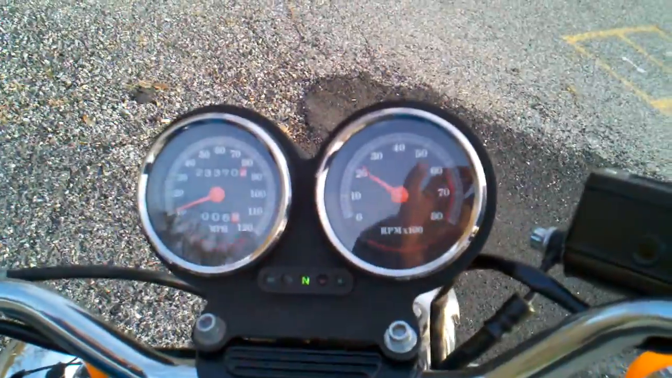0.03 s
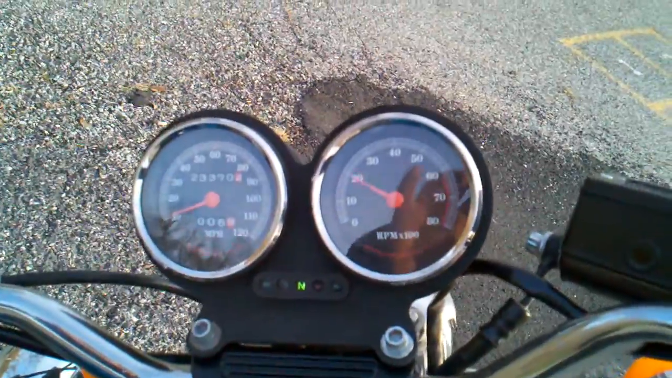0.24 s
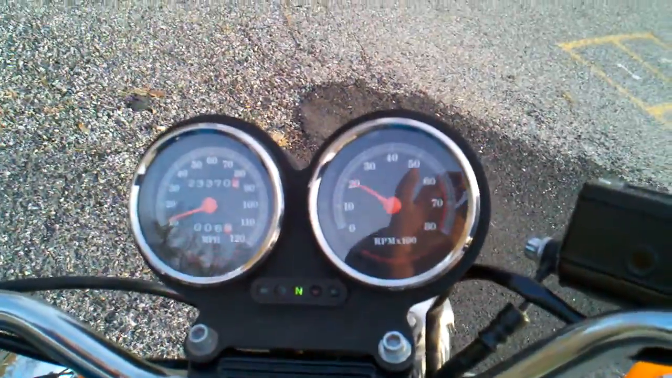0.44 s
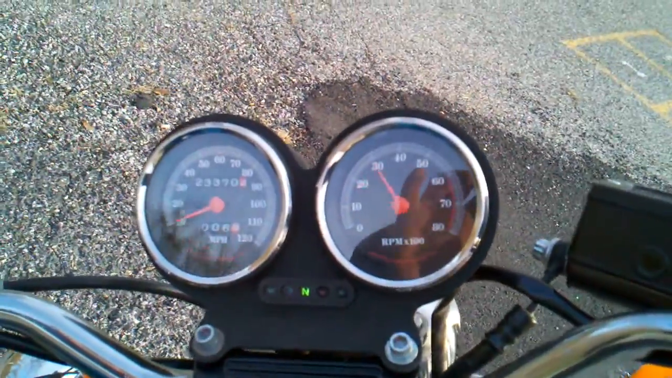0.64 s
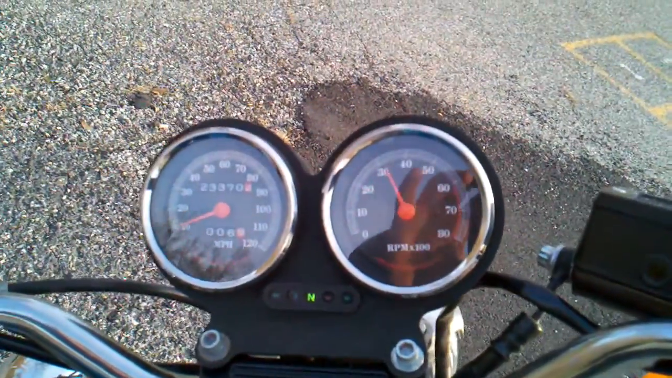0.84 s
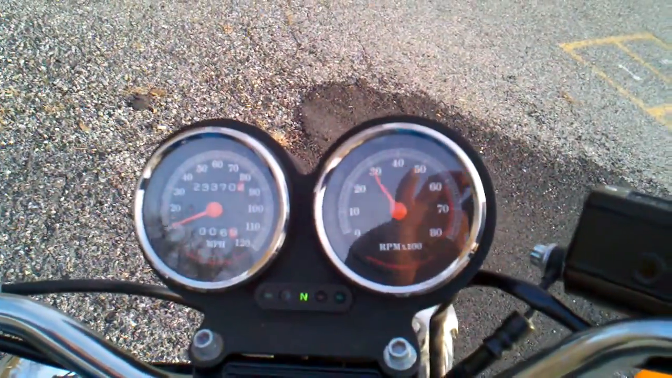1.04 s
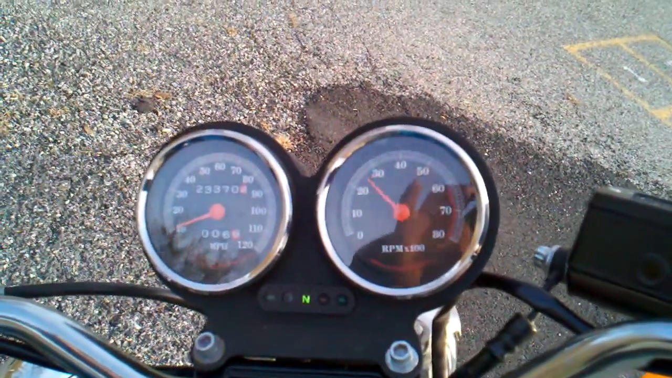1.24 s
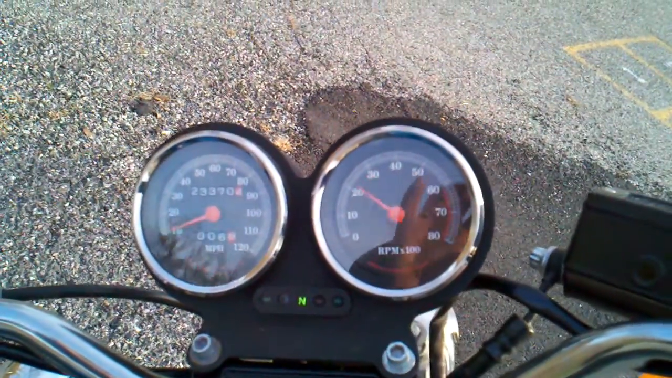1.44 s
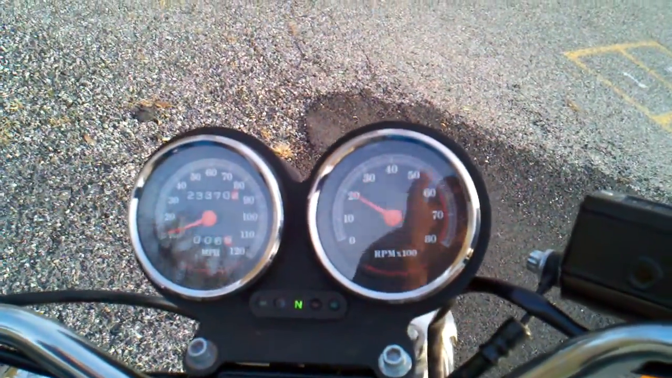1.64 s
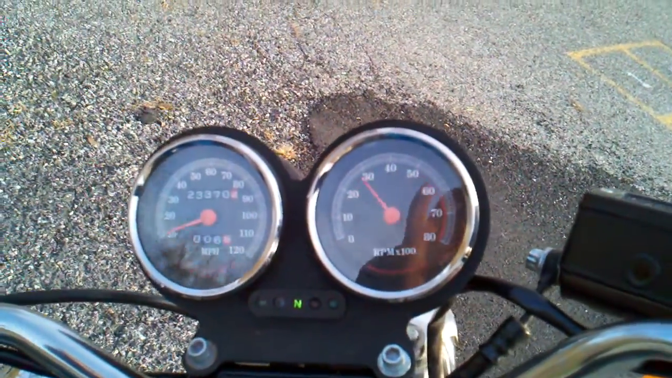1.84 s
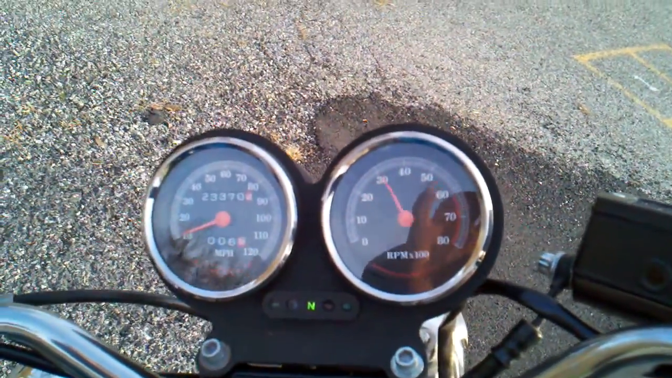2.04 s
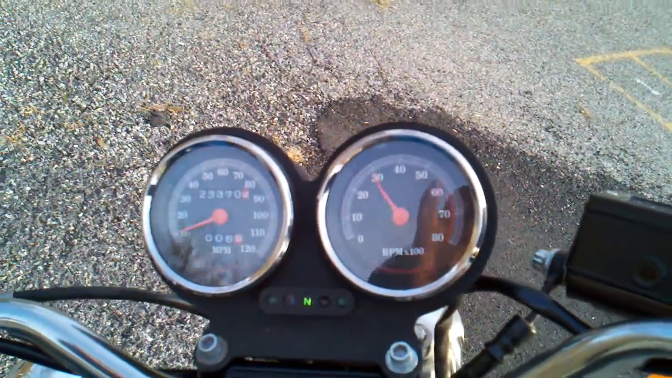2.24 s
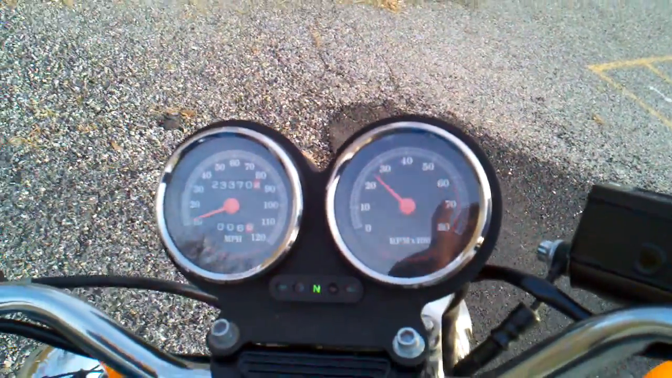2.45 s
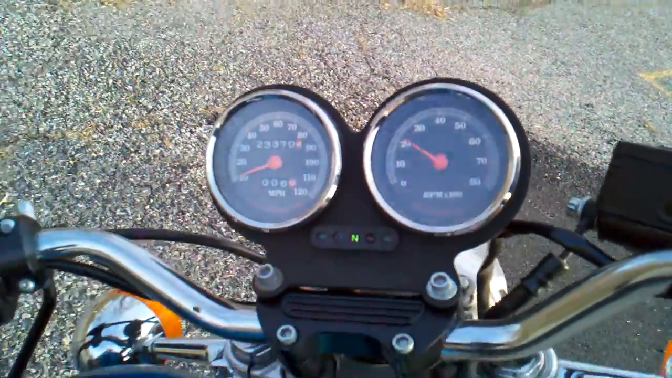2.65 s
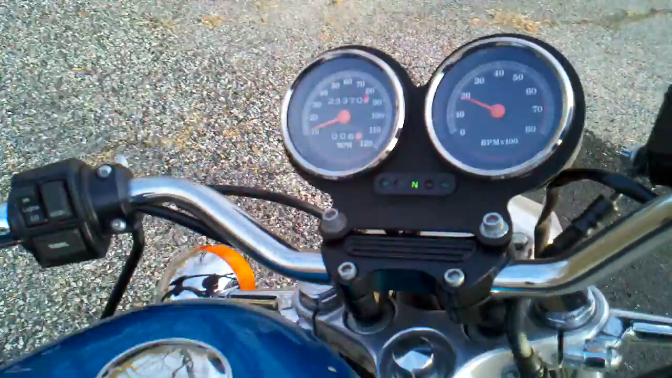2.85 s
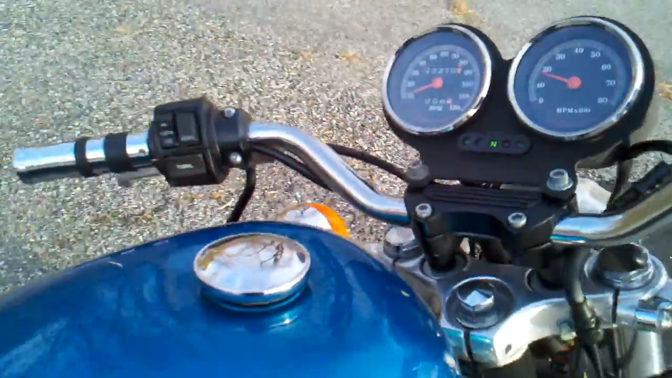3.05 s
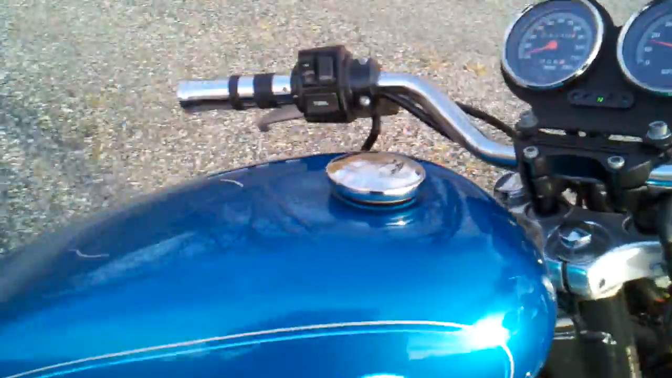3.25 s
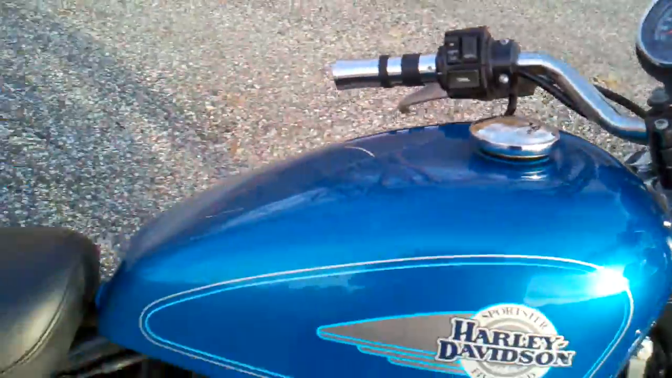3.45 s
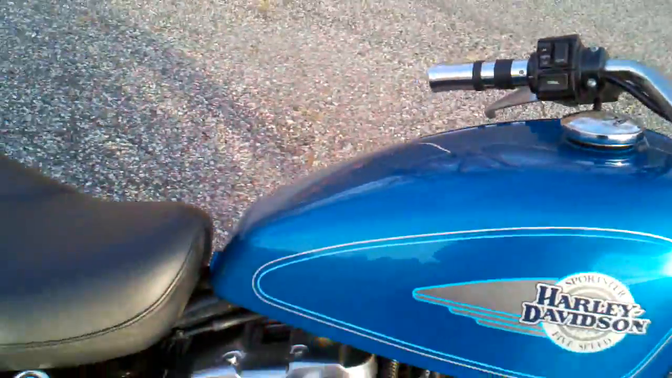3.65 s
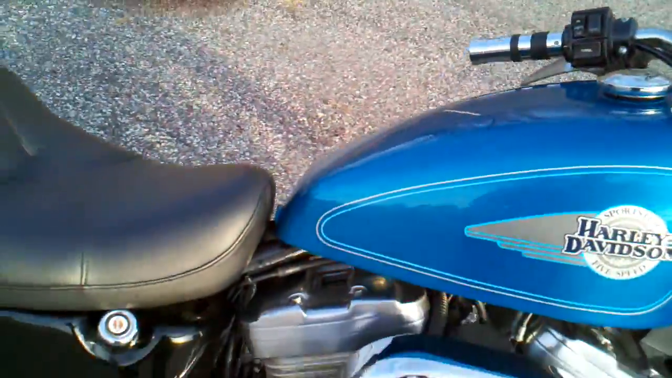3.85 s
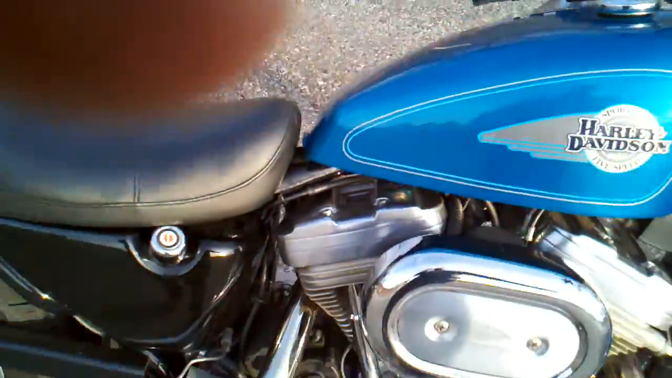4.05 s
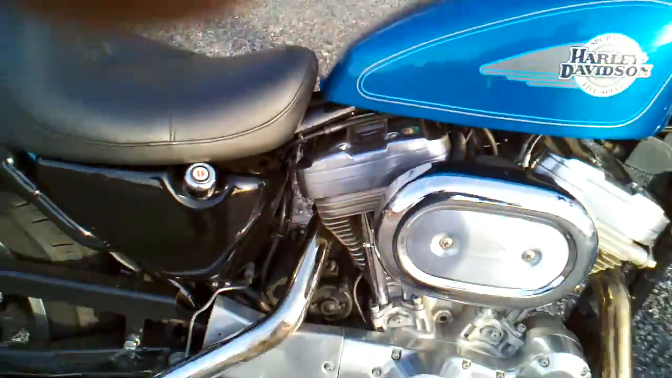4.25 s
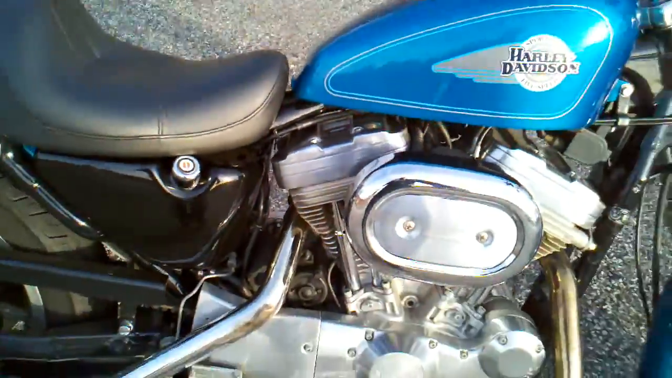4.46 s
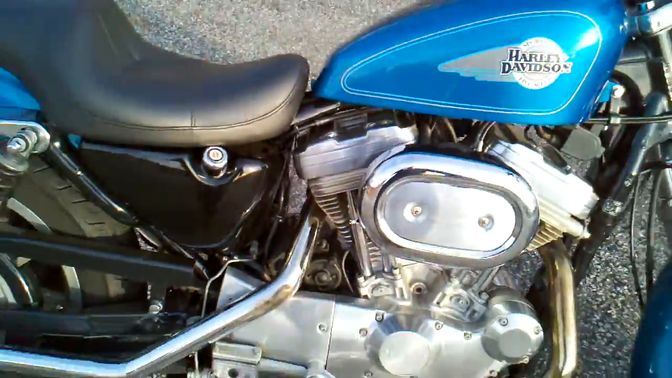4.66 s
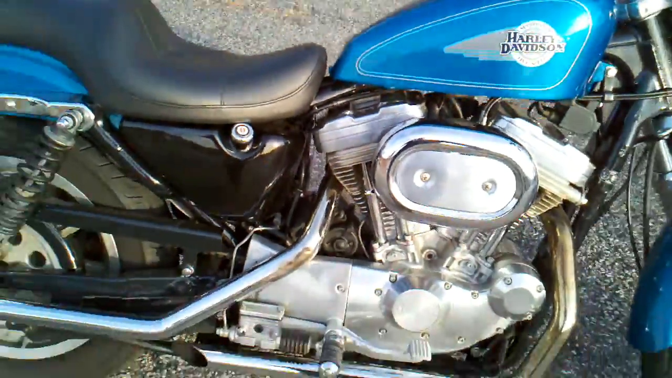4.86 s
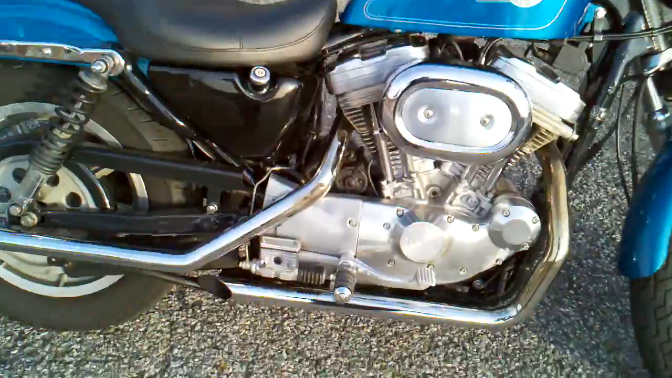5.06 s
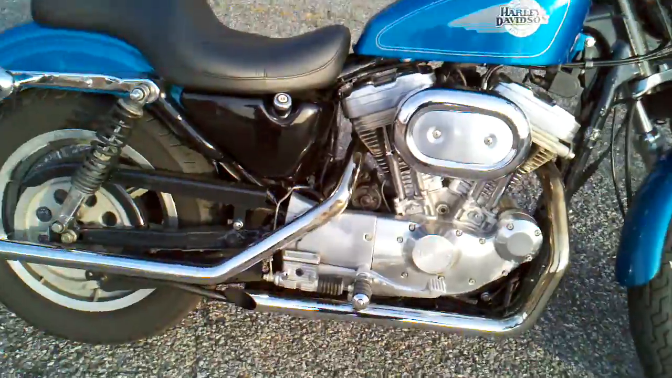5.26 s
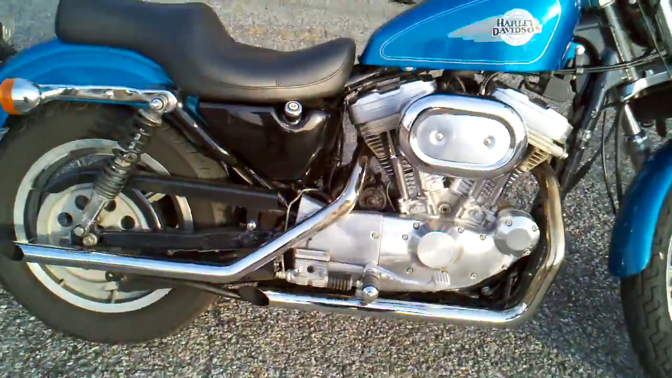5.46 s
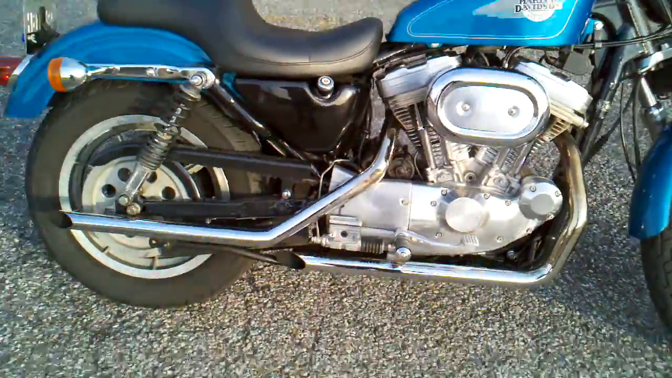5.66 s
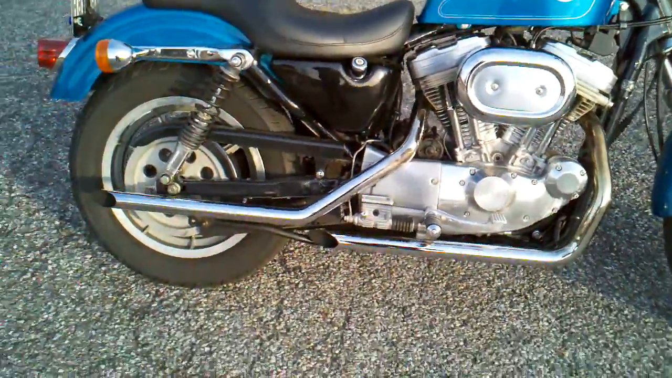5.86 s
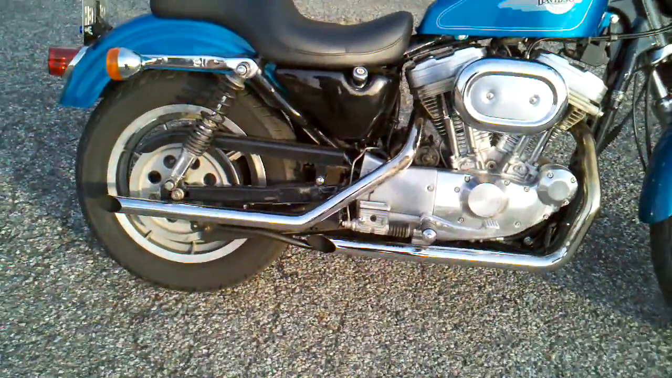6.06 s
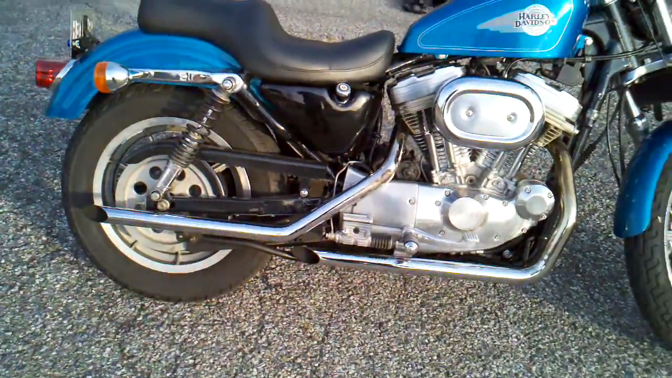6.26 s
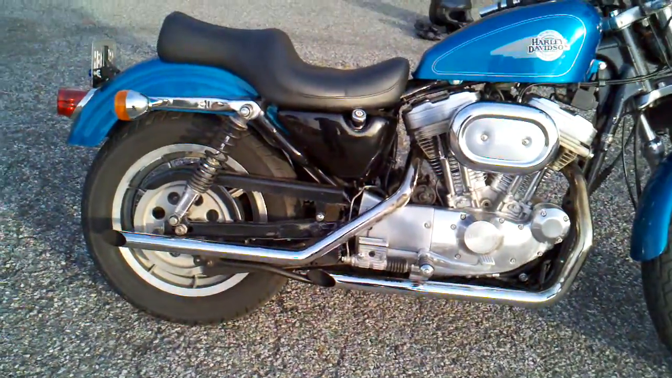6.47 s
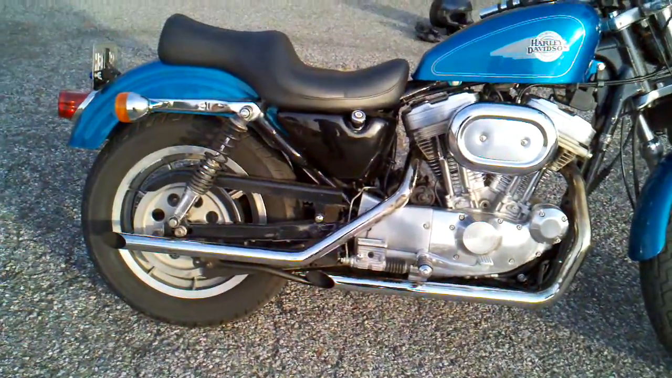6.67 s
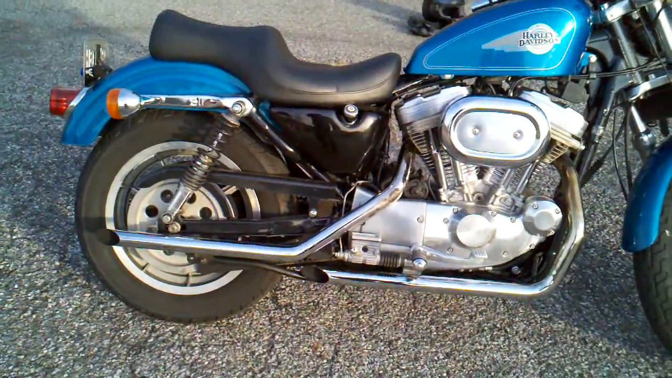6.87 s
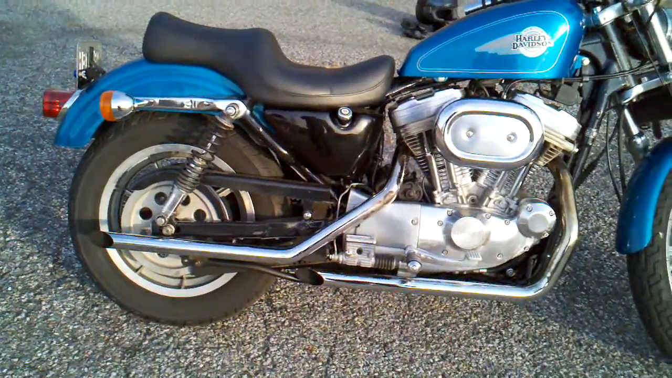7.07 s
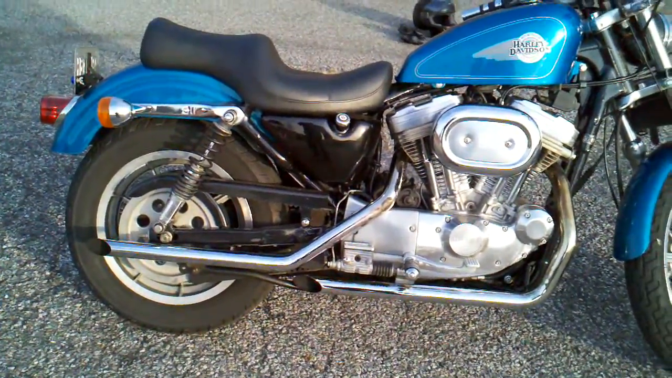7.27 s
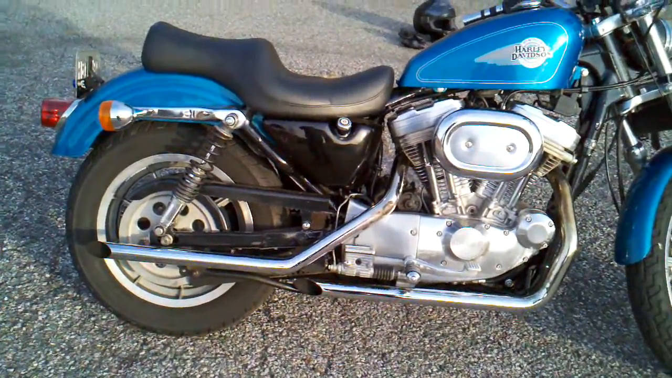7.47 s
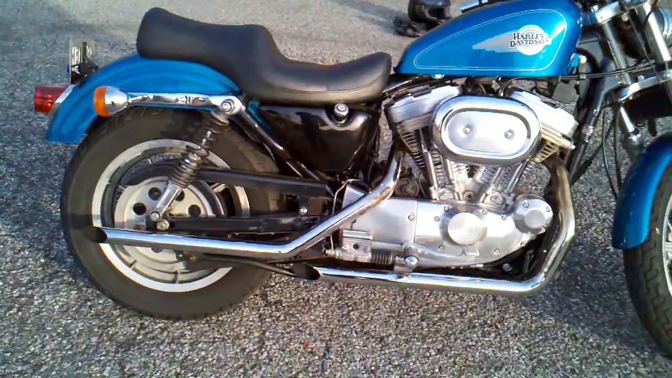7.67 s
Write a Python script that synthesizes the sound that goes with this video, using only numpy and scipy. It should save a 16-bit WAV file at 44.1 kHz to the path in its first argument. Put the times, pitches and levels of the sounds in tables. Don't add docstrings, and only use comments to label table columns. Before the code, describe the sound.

A large two-cylinder motorcycle engine, heard within arm's reach on an open parking lot. Two quick throttle blips swell into a droning, crackling roar, each falling away; the second sinks to a slow, uneven idle of thuds, sharp exhaust chuffs and rattling engine cases. The hand-held stereo microphone moves from above the tank round to the exhaust side, in a faint breeze.

```python
import sys
import numpy as np
from scipy import signal
from scipy.fft import rfft, irfft, next_fast_len
from scipy.io import wavfile
from scipy.ndimage import uniform_filter1d, map_coordinates

SR = 44100
rng = np.random.default_rng(int(sys.argv[2]) if len(sys.argv) > 2 else 0)


def dump(signal):
    limited = np.clip(np.atleast_2d(signal).T, -1, 1)
    pcm = np.round(limited * 32767).astype(np.int16)
    wavfile.write(sys.argv[1], SR, pcm)


def amplitude_ratio(level_db):
    exponent = np.asarray(level_db, float) / 20
    return 10 ** exponent


N = 340893


def rms_one(x):
    return x / np.sqrt(np.mean(x ** 2) + 1e-20)


def in_time(rows):
    s, *columns = np.transpose(rows)
    return [np.interp(np.arange(N) / SR, s, c) for c in columns]


def colour(x, points):
    size = next_fast_len(N)
    hz = np.fft.rfftfreq(size, 1 / SR) + 1
    at, level_db = np.transpose(points)
    gain = amplitude_ratio(np.interp(np.log(hz), np.log(at), level_db))
    return irfft(rfft(x, size) * gain, size)[..., :N]


def resonance(x, hz, width):
    r = np.exp(-np.pi * width / SR)
    poles = [1, -2 * r * np.cos(2 * np.pi * hz / SR), r * r]
    return signal.lfilter([(1 - r * r) / 2, 0, (r * r - 1) / 2], poles, x)


def steep_resonance(x, hz, width):
    return resonance(resonance(x, hz, width), hz, 2 * width)


def high_pass(x, order, hz):
    return signal.sosfilt(signal.butter(order, hz, "high", fs=SR, output="sos"), x)


def even(x, span_s):
    return x / np.sqrt(uniform_filter1d(x ** 2, int(span_s * SR)) + 1e-12)


def late(x, samples):
    return map_coordinates(x, [np.arange(N) - samples], order=3)


def early(x, lead_s):
    return np.roll(x, -int(lead_s * SR))


def linger(x, decay_s):
    return signal.lfilter([1], [1, -amplitude_ratio(-60 / (decay_s * SR))], x)


def crank(speed):
    return -1.47 + np.cumsum(speed) / SR


def above_idle(speed):
    return np.clip((speed - 8.5) / 6.5, 0, 1)


def under_power(speed):
    return uniform_filter1d(1. * (np.gradient(speed) > 0), size=2000)


def by_throttle(speed, idle_db, pull_db, overrun_db):
    revved, pulling = above_idle(speed), under_power(speed)
    return (1 - revved) * idle_db + revved * (pulling * pull_db + (1 - pulling) * overrun_db)


# share of the cycle, dB idling, dB pulling, dB on the overrun.
PULSES = [
    (.03, -3, 0, -14),
    (.31, 2, -10, -4),
    (.47, -3, -7, 0),
    (.755, -2, -12, -6),
]
# dB of the first, second, third and fourth pulse.
IDLE_BURN = [(-5, -3, 0, 4), (9, -2.5, -12, 1), (-6.9, 0, 3, 3), (10, -2.5, -2, 1), (-2, 4, 2.5, 3.4),
             (13, -2, -6, 2.5), (1, -0.5, 1, 0.5), (10, 0, -3, 1.5), (-2, -3.1, 0.3, 4), (11, 2.5, -7, 4.5),
             (-5.0, -0.3, 3.5, 1.2), (7, -3, -10, -1.1), (-1, -4, -5, 1), (2, -1, -7, 2), (8, -1, 0, 0.5),
             (7, -2.5, -6, 4), (-5, 0, 0, -2.5), (9, -1.5, -2, 5), (1, -2, -3, -1), (0, -2, 3, 6),
             (8, 2, -5, -0.5), (-2, 2, 4.5, 5), (13, 1.1, -5, 2), (0, 0.5, -0.5, 1), (7, -0.5, -11, -6),
             (6, -2, -0.4, 0), (11, 0.5, 4.5, 1.8), (6, -1.5, -11, 0.8), (9, -4.8, 0.6, -1.9)]


def pulse_train(speed, spread_db, jitter_s):
    cycle = crank(speed)
    turns = np.arange(-2, 140)
    clicks = np.full((len(PULSES), N), 1e-18)
    burn_db = np.zeros((len(turns), len(PULSES)))
    burn_db[72:][:len(IDLE_BURN)] = IDLE_BURN
    for k, (share, *levels_db) in enumerate(PULSES):
        at = np.interp(turns + share, cycle, np.arange(N), -N, -N)
        at = at + jitter_s * SR * rng.standard_normal(len(turns))
        size = amplitude_ratio(burn_db[:, k] + spread_db * rng.standard_normal(len(turns)))
        inside = (at > 0) & (at < N)
        sample = at[inside].astype(int)
        clicks[k, sample] += size[inside] * amplitude_ratio(by_throttle(speed, *levels_db)[sample])
    return clicks


# Hz, width in Hz, dB above the tank, lead in seconds, dB more at the side.
PIPES = [
    (207, 112, 0, 0.005, -2.5),
    (297.2, 20, -10, 0.016, 16.5),
    (280.6, 78, 5.5, -0.002, -11),
]
# Hz, width in Hz, dB.
UPPER_PIPE = (451.7, 45, -4.5)
# Hz, width in Hz, dB.
REAR_PIPE = (212, 49, 0)
# Hz, width in Hz, lead in seconds, dB.
SNAP = (170, 230, .006, 1)


def exhaust(clicks, first, level_db, upper_db, side, speed):
    faced = np.minimum(2.5 * side, 1)
    sinking = (1 - faced) * np.clip((20 - speed) / 6, 0, 1)
    drive = -clicks + (.07 + .7 * sinking) * rng.standard_normal(N)
    rings = 0
    for hz, width, db, lead_s, side_db in PIPES:
        mode = even(steep_resonance(early(drive, lead_s), hz, width), 0.237)
        rings = rings + amplitude_ratio(db + side_db * faced) * mode
    hz, width, db = UPPER_PIPE
    rings = rings + amplitude_ratio(db + upper_db) * even(steep_resonance(drive, hz, width), 0.237)
    hz, width, db = REAR_PIPE
    rear = even(steep_resonance(-early(first, 0.00603), hz, width), 0.237)
    rings = rings + amplitude_ratio(db - 30 * (1 - faced)) * rear
    hz, width, lead_s, db = SNAP
    rings = rings + faced * amplitude_ratio(db) * even(resonance(-early(clicks, lead_s), hz, width), .6)
    return amplitude_ratio(level_db - sinking) * even(rings, .3)


# multiple of the cycle rate, dB.
DRONE_ORDERS = [(3, 6.5), (4, 17), (5, 13), (6, 3.5), (7, -6), (8, 7), (9, 0), (10, 0)]
# Hz, width in Hz.
BOOM = (95, 50)
# Hz, width in Hz, lead in seconds.
THUD = (90., 87, 0.01593)


def boom(speed, clicks, level_db):
    turned = crank(speed) - .45
    drone = sum(amplitude_ratio(db) * np.sin(2 * np.pi * order * turned + order ** 2) for order, db in DRONE_ORDERS)
    drone = even(steep_resonance(drone, *BOOM), 0.38)
    hz, width, lead_s = THUD
    thuds = -early(clicks, lead_s) + .1 * rng.standard_normal(N)
    thuds = even(resonance(resonance(thuds, hz, width), hz, width), 0.49)
    droning = np.clip((speed - 7.9) / 3.2, 0, 1) * (1 - 0.25 * under_power(speed))
    low = droning * drone + (1 - .75 * droning) * thuds
    return amplitude_ratio(level_db) * even(high_pass(low, 6, 66.), 0.35)


# time of the peak in seconds, dB at 4.5-8.5 kHz,
# dB more below, dB more above.
BLIP_CRACKS = [(0.109, -45, 6, 7), (0.1799, -54, 12, 0), (0.3693, -57, 15, 9), (0.4295, -36.5, 13, 8),
               (0.4539, -34, -6, 4), (0.4817, -30, 6, 5.5), (0.553, -47, 0, 12), (0.5728, -26.5, 0, 2),
               (0.5919, -34, -1, 4), (0.6149, -48, 6, 13), (0.7347, -31.5, 8.5, 3), (0.7714, -29.5, 6.5, 2.5),
               (0.8087, -20.5, -2, -2), (0.8469, -23.5, 0.5, -0.5), (0.8856, -30.5, 7, 3.5),
               (0.9258, -28, 4.5, 2.5), (0.9682, -47, 16, -4), (1.0112, -56, 7, 0), (1.0559, -51, 11, 7),
               (1.0958, -50, 11, 6), (1.1408, -45, -2, 3), (1.1947, -52, 5, -4), (1.2448, -50, 11, 9),
               (1.2983, -55, 14, 5), (1.3477, -30.5, -4, -3.5), (1.4725, -48, 5, 5),
               (1.646, -46, 8, 8), (1.6813, -41, -6, 4), (1.7058, -31, 2, 2), (1.7273, -39, -8, 8),
          (1.7546, -25.5, -0.5, 1.5), (1.7763, -41, 1, 4), (1.799, -28.5, 0, 5), (1.818, -31, 2, -1),
          (1.8403, -36, 5, 7.5), (1.927, -23.5, 0.5, -0.5), (1.964, -21, -2, -3), (2.0003, -19.5, -4, -1.5),
          (2.0388, -19.5, -2, -2), (2.0781, -20, -1, -4), (2.118, -31.5, 8.5, 4.5), (2.1606, -43, 12, -2),
          (2.2039, -46, 7, 0), (2.2495, -45, 7, -6), (2.3022, -42, -8, -1), (2.3441, -56, 11, 2),
          (2.3875, -41, 2, -3), (2.4397, -48, 6, -1), (2.492, -47, 4, 5), (2.5506, -53.5, 12, 9),
          (2.6171, -58, 2, -2), (2.6761, -47, -12, 1), (2.7886, -60, -1, 14), (2.8626, -55, -7, -6),
          (2.943, -50, 6, -6), (3.1746, -42, 7, 3), (3.3493, -38, 0, 3), (3.4821, -51, -13, -4),
          (3.5467, -48, -3, -5)]
IDLE_CRACKS = [(3.8052, -53, 0, 8.5), (3.8765, -37, -21, 4), (4.0507, -37.5, -3, 0.5), (4.1217, -36.5, -6, -2.5),
               (4.1887, -37.5, -7, -2), (4.2539, -34.5, -1, -1), (4.305, -48.5, 13.5, 4), (4.379, -33, -3, 3),
               (4.3957, -47, -16, 1), (4.4372, -42.5, 7.5, 4), (4.514, -37.5, 6, 6), (4.5702, -30, -6, -2),
               (4.644, -30.5, -0.5, 2), (4.7078, -45, -14, 8.5), (4.7805, -30, -0.5, 3), (4.8383, -32.5, -6, 3),
               (4.9142, -28.5, -12, -1), (4.9324, -51, -2, -9), (4.9759, -39.5, 6, 4), (5.0617, -47, -14, -2),
               (5.1075, -33.5, 5.5, 7), (5.1827, -29, -4, -1.5), (5.2417, -41, -8, 10), (5.3198, -39.5, 9, 6),
               (5.3708, -34.5, -4, 1.5), (5.4448, -31, -13, 3), (5.5053, -38, -2, 7.5), (5.6315, -31, 3, 4.5),
               (5.6511, -47, -4, -14), (5.7045, -32, -4, -0.5), (5.7653, -33.5, -3, 3.5), (5.7896, -56, 11, 10),
               (5.891, -28.5, -4, 5), (5.9638, -34, 1, 7), (6.026, -36, -1, 7.5), (6.0955, -34.5, -1, 1),
          (6.1555, -32, -7, 7), (6.2263, -35, 4, 4.5), (6.2905, -37, 4, 8), (6.3663, -33.5, 4, 2),
          (6.4308, -38, -10, 3), (6.5154, -23, -6, -1.5), (6.5382, -54, -2, -4), (6.5756, -27.5, -4, 4),
          (6.646, -29, -1, 8), (6.7065, -34.5, -3, 5.5), (6.775, -35.5, 3, 3.5), (6.8337, -30.5, -2, 8),
          (6.9053, -30, 0.5, 1.5), (6.9252, -44, 4, -4), (6.9688, -30.5, -4, 4), (7.039, -34.5, 1, 0),
          (7.096, -27, -2, 5), (7.1162, -44, -3, -12), (7.1691, -39, 4, -1), (7.234, -51, -2, 9),
          (7.3032, -34.5, 2, 0.5), (7.4366, -42, 2, 4), (7.4927, -31, 1, 5), (7.5645, -28.5, -2, 3.5),
          (7.627, -29, -5, 0.5)]
# share of the cycle, dB idling, dB pulling, dB on the overrun.
BURSTS = [
    (-.015, 6, -25, -42),
    (0.427, 1, -3, -21),
]


def burst_rows(speed, level_db, side):
    rows = []
    for cracks, gain_db, rise_ms in ((BLIP_CRACKS, 15.5, 1.6), (IDLE_CRACKS, 13, 3.0)):
        for s, db, low_db, top_db in cracks:
            rows.append((s, db + gain_db, low_db + 5.5, top_db - 1.5, rise_ms))
    crack_s, turns = np.array(rows)[:, 0], np.arange(0, 98)
    overrun = above_idle(speed) * (1 - under_power(speed))
    for share, idle_db, pull_db, overrun_db in BURSTS:
        at = np.interp(turns + share, crank(speed), np.arange(N)).astype(int)
        idle_db = idle_db * np.minimum(2 * side, 1)
        db = (level_db + by_throttle(speed, idle_db, pull_db, overrun_db))[at]
        db = db - 16.0 - 17 * rng.exponential(1, len(at))
        low_db, top_db = 2.5 * rng.standard_normal((2, len(at)))
        low_db = low_db + 5 * overrun[at]
        for s, *levels_db in zip(at / SR, db, low_db, top_db):
            if np.abs(crack_s - s).min() > .02:
                rows.append((s, *levels_db, 3))
    return rows


# Hz, dB per Hz.
CHUFF = [(600, 16), (1500, 2), (2300, 10), (3400, 8.5), (5000, -3.5), (6500, -1), (7600, 8), (9500, 6),
         (12000, 4.5), (14000, -1)]


def chuffs(rows):
    gates = np.zeros((3, N))
    for s, peak_db, low_db, top_db, ms in rows:
        t = np.arange(int(0.095 * SR)) / SR / (max(ms, .5) / 1000)
        swell = (t * np.exp(1 - t)) ** 2
        trail = 0.24 * np.tanh(t) * np.exp(-t / 7.9)
        shape = amplitude_ratio(peak_db - 5.5) * (swell + trail)
        at = max(int((s - ms / 1000) * SR), 0)
        gates[:, at:at + len(t)] += np.outer(amplitude_ratio(np.array([low_db, 0, top_db])), shape[:N - at])
    gas = rms_one(colour(rng.standard_normal((2, N)), CHUFF))
    under, most = (signal.sosfilt(signal.butter(3, hz, fs=SR, output="sos"), gas) for hz in (4500, 8500))
    bursts = gates[0] * under + gates[1] * (most - under) + gates[2] * (gas - most)
    return high_pass(bursts, 3, 1200)


# Hz, width in Hz, dB.
CASES = [
    (412, 243, 3),
    (684, 141, 1),
    (820, 230, -11.5),
    (1101, 96, -2.5),
    (1263, 210, -9),
    (1803, 230, -5),
    (2053, 77, -4),
]
# seconds, span in seconds, dB of cover ring, dB of upper panels.
PAST_TANK = (3, 0.15, 4, -10)


def clatter(speed, stroke, level_db, upper_db):
    revved = above_idle(speed)
    shake = linger(pulse_train(speed, spread_db=10.0, jitter_s=0.00088).sum(axis=0), 0.06)
    stir = 1.93 + (0.66 + 0.22 * revved) * even(shake, 0.29)
    locked, per_cycle = .8 * revved, 1200
    contacts = rng.standard_normal((len(CASES), 2, per_cycle))
    contacts = contacts[..., (crank(speed) % 1 * per_cycle).astype(int)]
    loose = rng.standard_normal((len(CASES), 2, N))
    knocks = 1.3 * (np.sqrt(1 - locked) * loose + np.sqrt(locked) * contacts) * stir
    knocks = knocks + amplitude_ratio(36) * revved * (1 - under_power(speed)) * stroke
    s, span_s, ring_db, panels_db = PAST_TANK
    shaded = np.exp(-((np.arange(N) / SR - s) / span_s) ** 2)
    knocks[0] *= amplitude_ratio(0.15 * upper_db)
    knocks[1] *= amplitude_ratio(-4. * revved + ring_db * shaded)
    knocks[2:4] *= amplitude_ratio(panels_db * shaded)
    cases = sum(amplitude_ratio(db) * resonance(d, hz, width) for d, (hz, width, db) in zip(knocks, CASES))
    return amplitude_ratio(level_db) * even(high_pass(cases, 3, 380), 0.2)


# Hz, dB per Hz.
HISS = [(1500, 11), (2700, 10), (3300, 15.5), (5000, -4.5), (6600, 2.5), (8000, 14.5), (10000, 7),
        (13500, 9.5)]


def hiss(speed, level_db):
    breath = linger(pulse_train(speed, spread_db=-2.5, jitter_s=0.014).sum(axis=0), .09)
    gas = colour(rng.standard_normal((2, N)), [(700, -68.0)] + HISS)
    return amplitude_ratio(level_db + 4.0) * even(gas * (1.2 + even(breath, 0.38)), 0.25)


# Hz, width in Hz, dB against the engine level.
RUMBLE = (243, 280, -10)


def rumble(level_db):
    hz, width, db = RUMBLE
    gas = rms_one(steep_resonance(rng.standard_normal((2, N)), hz, width))
    return amplitude_ratio(level_db + db + np.array([[0], [-5.5]])) * gas


# Hz, dB.
SHADE = [(80, -16), (250, -20), (600, -19), (1200, -14), (2000, -3), (3000, -.5)]
# Hz, dB.
SCATTER = [(100, -66), (400, -12), (1200, -2), (2500, -16), (6000, 6), (14000, 1.5)]
# time in seconds, samples late.
PORT_LAG = [(0., 9.7), (1., 8.4), (2.5, 8.1), (3.3, 10.8), (4., 8.9), (4.6, 9.2), (5.5, 7.8), (6.5, 4.1),
            (7.73, 5.7)]


def ports(near, around):
    shaded = near - colour(near, SHADE)
    return np.array([near, late(shaded, in_time(PORT_LAG)[0]) + colour(around, SCATTER)])


# time in seconds, four-stroke cycles per second.
SPEED = [(0.0, 16.27), (0.396, 17.89), (0.706, 28.98), (1.043, 22.44), (1.2, 20.59), (1.4, 15.48),
         (1.615, 14.85), (1.892, 28.36), (2.539, 17.33), (3.101, 12.14), (3.741, 10.29), (3.977, 7.94),
         (4.817, 7.37), (5.62, 7.74), (6.239, 7.56), (6.461, 6.43), (6.559, 7.68), (7.73, 7.54)]
# time in seconds, engine level in dB, exhaust load in dB.
ENGINE = [(0, -27, -2), (.22, -33, -7.5), (.45, -26, 3.5), (.62, -21.5, 3), (.69, -21.5, -7.5),
          (.88, -21.5, -5), (1.38, -32.5, 0), (1.6, -33.5, -2.5), (1.81, -22, 3.5), (1.89, -25, -0.5),
          (1.97, -19.5, -5.5), (2.52, -31, 0), (2.91, -33, -2.5), (4.2, -37.5, -0.5), (6.3, -35, 2.5),
          (6.47, -36.5, -1), (6.57, -34, 2.5), (7.73, -32.5, 2.5)]
# time in seconds, share of the way from above the tank to the exhaust side.
WALK = [
    (0, 0.12),
    (3.5, 0.066),
    (4.2, 0.23),
    (5., 0.37),
    (6., 0.49),
    (6.7, 0.41),
    (7.73, 0.51),
]
# cycles per second, width in cycles per second, dB.
BOOM_SWELL = (11.1, 0.6, 4.3)
# cycles per second, width in cycles per second, dB.
BOOM_SAG = (13.7, 0.91, -5)


def scene():
    speed, side = in_time(SPEED)[0], in_time(WALK)[0]
    level_db, load_db = in_time(ENGINE)
    revved = above_idle(speed)
    lope_db = 3 * (1 - revved) * side * np.cos(np.pi * (crank(speed) - 0.92))
    boom_db = level_db - 3.5 + 0.5 * revved * under_power(speed) + 0.51 * load_db + 12 * side + lope_db
    for centre, width, db in (BOOM_SWELL, BOOM_SAG):
        boom_db = boom_db + db * np.exp(-((speed - centre) / width) ** 2)
    upper_db = 4.5 - 0.3 * load_db - 54 * side + 0.87 * (speed - 24)

    pulses = pulse_train(speed, spread_db=1.2, jitter_s=.0003)
    first = pulses[0]
    clicks = even(pulses.sum(axis=0) - .7 * (1 - revved) * first, .6)
    pipes = boom(speed, clicks, boom_db)
    pipes = pipes + exhaust(clicks, first, level_db + load_db + lope_db, upper_db, side, speed)
    paths = clatter(speed, early(pulses[2], 0.0022), level_db + 0.43 * lope_db, upper_db)
    paths = paths + hiss(speed, level_db - 14.5 + 8 * side)
    direct, around = paths + chuffs(burst_rows(speed, level_db, side))
    echoes = np.roll(pipes, 5000)
    return ports(pipes + direct, around + echoes) + rumble(level_db - 12 * side)


# Hz, dB per Hz.
BREEZE = [(25, -5), (50, -2), (120, 0), (400, -22)]


def breeze():
    drift = rms_one(colour(rng.standard_normal((2, N)), [(3, 0), (30, -40)]))
    wind = colour(rng.standard_normal((2, N)), BREEZE)
    return amplitude_ratio(-45) * rms_one(amplitude_ratio(3. * drift) * wind)


def band_limit(x):
    return signal.sosfilt(signal.butter(12, 14250, fs=SR, output="sos"), x)


def record(dry):
    delayed = np.array([late(port, 16.7) for port in dry[::-1]])
    beams = dry - colour(delayed, [(3500, 0), (5500, -2), (8000, -3.5), (14000, -5)])
    lift = signal.bilinear([1, 2 * np.pi * 500.], [1, 2 * np.pi * 60.], SR)
    beams = signal.lfilter(*lift, beams)
    beams = signal.sosfilt(signal.cheby2(14, 34, 14250, fs=SR, output="sos"), beams)
    beams = np.tanh((beams + breeze()) * amplitude_ratio(-1.0) / 1.736) * 1.285
    return band_limit(high_pass(beams, 2, 45))


dry = scene()
out = record(dry)
dump(out)
```